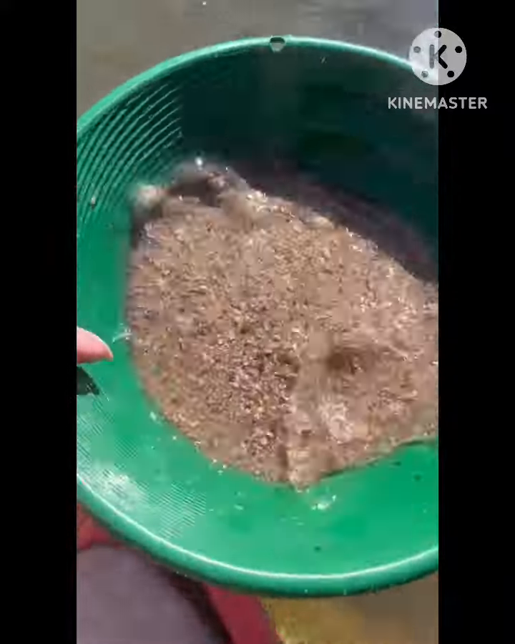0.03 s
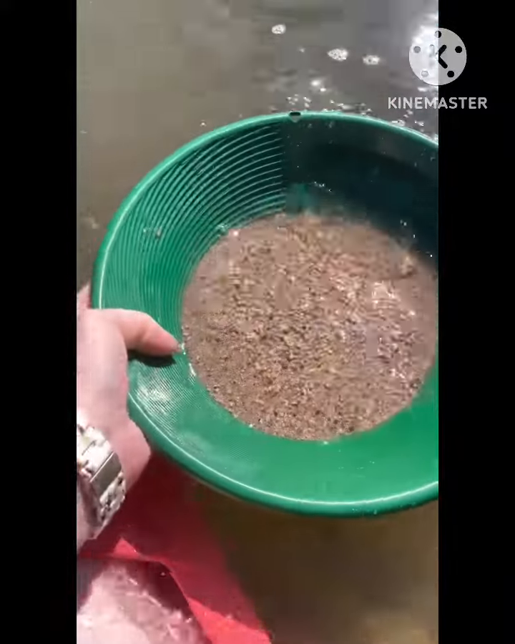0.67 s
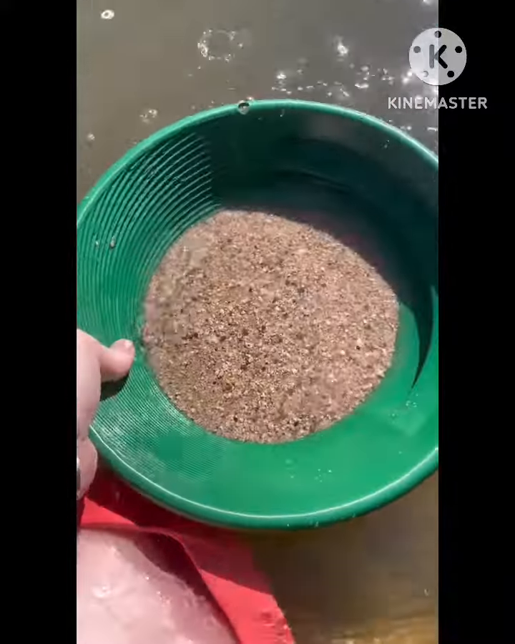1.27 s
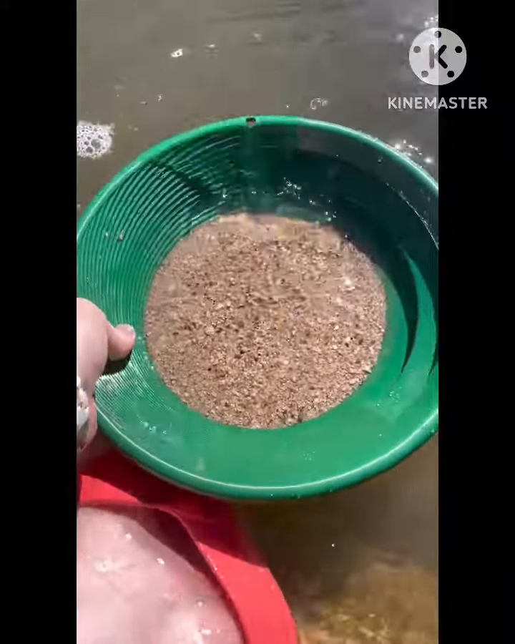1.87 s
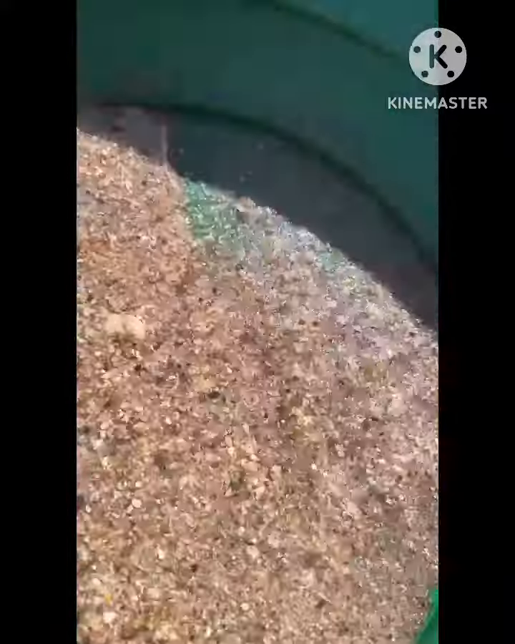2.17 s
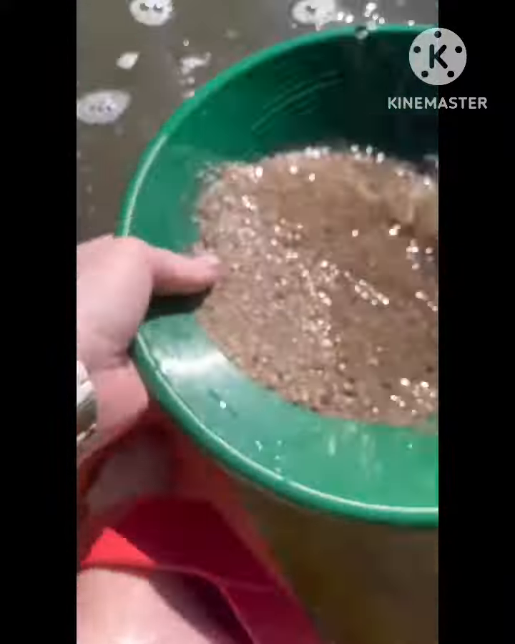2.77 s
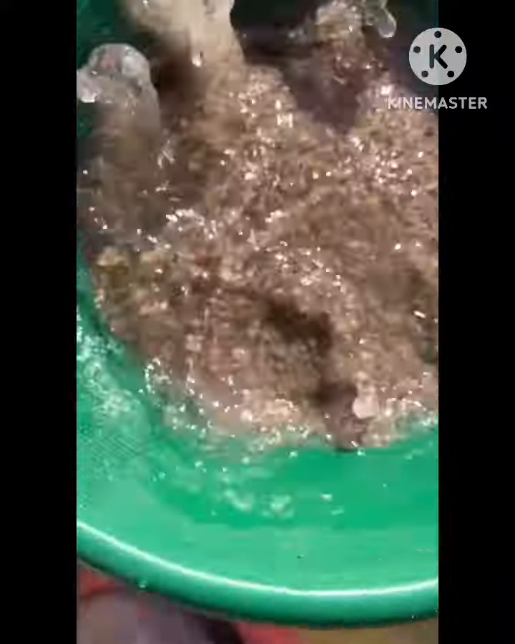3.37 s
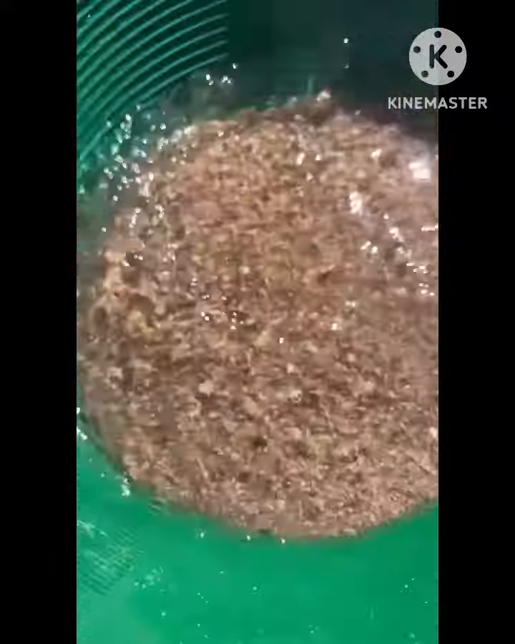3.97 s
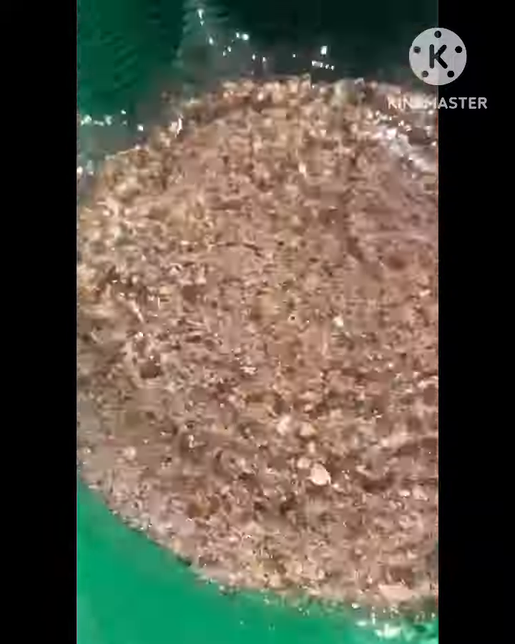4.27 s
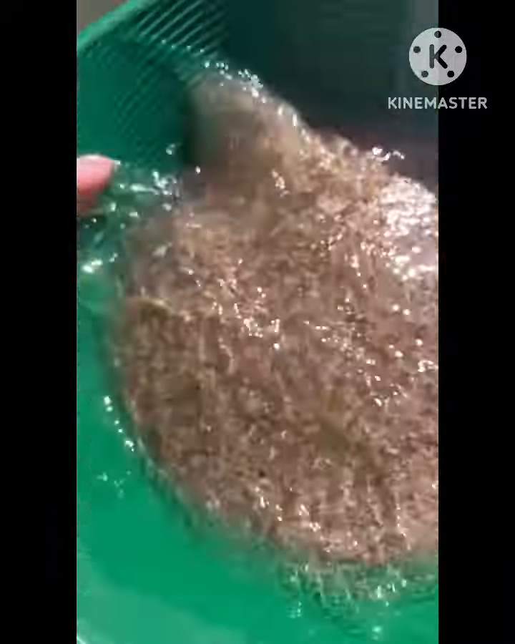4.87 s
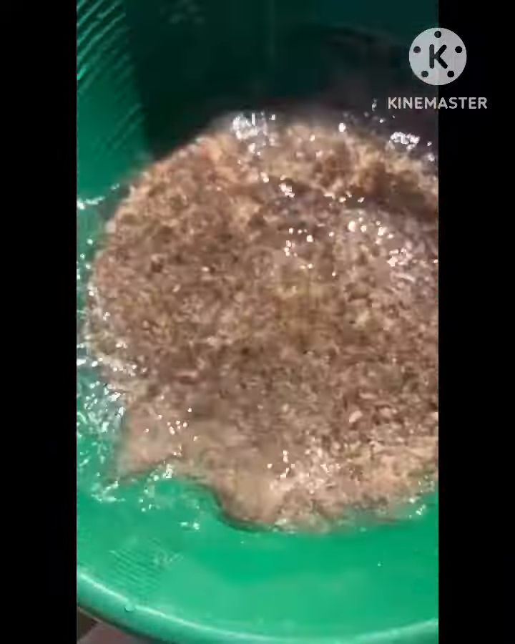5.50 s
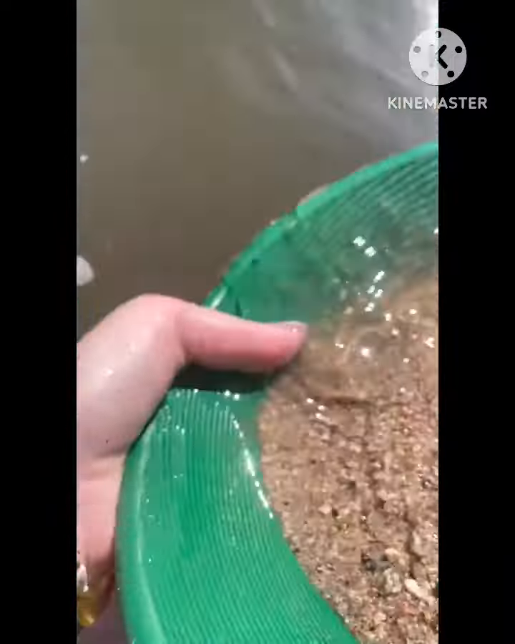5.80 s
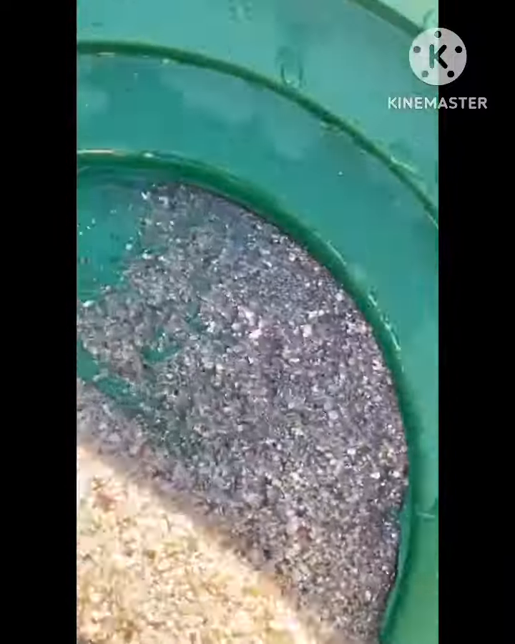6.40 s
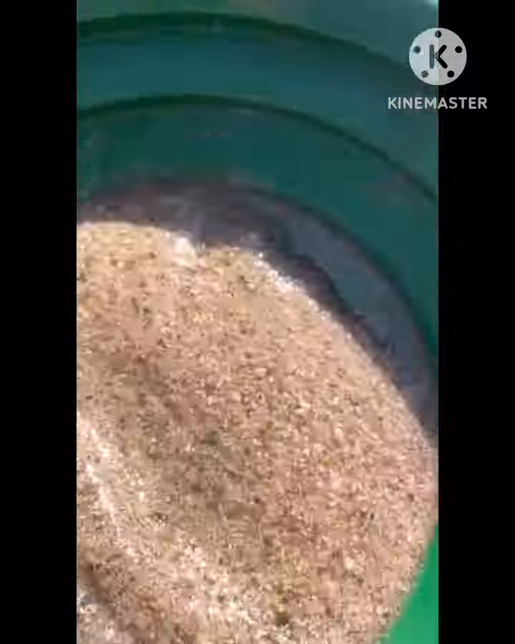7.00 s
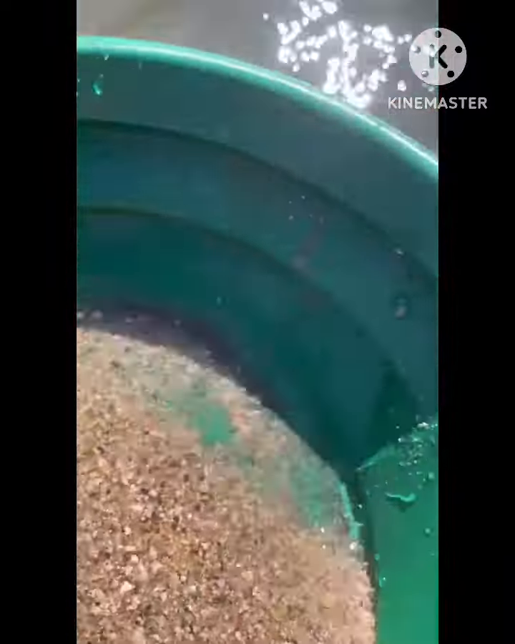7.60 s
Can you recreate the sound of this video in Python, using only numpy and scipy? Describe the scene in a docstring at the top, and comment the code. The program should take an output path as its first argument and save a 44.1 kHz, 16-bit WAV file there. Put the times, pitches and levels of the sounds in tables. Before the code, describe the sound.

A river rushes as wet sand hisses and water spits around a gold pan, with wind rumbling on the microphone.

```python
"""Gold panning at a river

Gravel is swirled in a plastic pan just above a rushing river, close to a phone. Two scenes, with a
brief fade between. First: wind rumble, stones clacking on the pan, a hollow knock. Second: water laps
and spits as trapped bubbles ring, sand hisses round the pan, and a gust buffets the microphone."""
import sys
import numpy as np
from scipy import signal
from scipy.fft import rfft, irfft
from scipy.io import wavfile

SR = 44100
rng = np.random.default_rng(int(sys.argv[2]) if len(sys.argv) > 2 else 0)


def generate_wav(sig):
    """Save sig (samples, or channels by samples) to the path in sys.argv[1] as 16-bit PCM at SR."""
    pcm = np.round(np.clip(np.atleast_2d(sig).T, -1, 1) * 32767).astype(np.int16)
    wavfile.write(sys.argv[1], SR, pcm)


N = 337365
TIME_S, FREQ_HZ = np.arange(N) / SR, np.arange(N // 2 + 1) * SR / N
TOP_HZ = 16000

# waves over the gravel: t/s, water level/dB, sand level/dB
SWIRLS = [(0.65, -40, -67), (1.319, -43.5, -66), (2.7, -53, -48.5), (3.13, -56, -46.5), (3.5, -56, -45.5),
          (3.73, -55, -49), (4.57, -41, -47), (4.78, -44, -49.5), (5.26, -53, -47.5), (5.86, -46, -48),
          (6.2, -40, -46), (7.03, -44.5, -47.5)]
# sliding sand: f/Hz, level/dB
SAND_SPECTRUM = [(1500, -13.5), (4000, -16.5), (6500, -7), (8500, 2), (12000, -5.5), (16000, -2)]
# coarse grains: t/s, peak/dB
TICKS = [(0.2255, -33), (0.257, -31), (2.6485, -26), (2.809, -21.5), (3, -25), (3.1345, -32), (3.157, -20),
         (3.616, -23), (3.66, -17), (3.73, -24), (4.5, -32), (4.59, -30), (4.8231, -30), (4.8637, -31),
         (5.2827, -32)]
# stones on the pan: t/s, blow/dB, scrape/dB, scrape length/s
STONES = [(0.3821, -31, -27.5, 0.01), (0.391, -28, -23, 0.019), (0.4018, -15.5, -29, 0.0058),
          (0.4041, -7, -25.5, 0.0035), (0.4109, -24.5, -21.5, 0.0055), (0.418, -30, -40.5, 0.042)]
# plastic pan: f/Hz, level/dB, t60/s
PAN_MODES = [(1000, -15, .012), (1580, -7, .014), (1917, -11, .04), (2000, 1.5, .01), (3190, -14, .025),
             (3400, 4, .008), (3550, -12, .025), (5090, -19, .035), (5435, -17, .04), (6190, -12, .035)]
# skidding stones: f/Hz, level/dB
SCRAPE_SPECTRUM = [(400, 1), (1800, -3.5), (6000, -1), (8500, -15.5), (10800, -1), (15000, -28)]
# knock and two bounces: t/s, level/dB
KNOCKS = [(0.8384, -12.5), (0.8474, -17.5), (0.8554, -22)]
# hollow body: f/Hz, level/dB, t60/s
KNOCK_MODES = [(780, -12.5, 0.036), (1210, 0, 0.024), (1380, -9, 0.0096)]
# bubbles of droplets, larger air pockets and low laps: t/s, level/dB, f/Hz
DROPLETS = [(2.661, -30, 5000), (2.816, -26.5, 4870), (3.0006, -31, 5350), (3.112, -34, 6200),
            (3.1547, -22.5, 8400), (3.159, -31, 5200), (3.446, -36, 10200), (3.495, -28, 5877),
            (3.5127, -19.5, 7120), (3.6195, -25.5, 6160), (3.6285, -28, 6750), (3.6602, -29, 5420),
            (3.734, -25.5, 9200), (4.3973, -30.5, 11000), (4.5213, -28, 4970), (4.527, -32, 6600),
            (4.6555, -32, 11800), (4.6662, -24.5, 10500), (4.6841, -30.5, 8950), (5.217, -35.5, 5900),
            (5.245, -30, 11800), (5.247, -36, 6700), (5.2552, -26, 11400), (6.9192, -28, 8100)]
PLIPS = [(0.5926, -35, 1430), (0.615, -33, 1400), (0.639, -30, 1380), (1.3533, -35, 1853),
         (1.4474, -39, 2900), (3.101, -26.5, 2740), (5.8425, -31, 1511), (5.8584, -35, 1630),
         (6.0014, -40, 2070), (6.1605, -29, 1350), (6.2841, -31, 1770)]
LAPS = [(2.974, -31.5, 258.8), (3.649, -34, 205), (3.813, -27, 292), (3.914, -23.5, 271), (4.026, -34, 189),
        (6.565, -31, 259), (7.479, -23, 327.4)]
# water breaking on gravel: t/s, length/s, level/dB, centre/Hz
SPRAYS = [(0.985, 0.01, -43, 2300), (0.991, 0.013, -43, 6000), (2.64, 0.031, -44, 8800),
          (3.108, 0.019, -47, 10470), (3.451, 0.04, -50, 11000), (3.503, 0.022, -41, 10500),
          (3.616, 0.015, -40, 8000), (4.534, 0.03, -45, 9500), (5.844, 0.027, -43, 5500),
          (6.138, 0.2, -48, 1880)]
NOTCHED_RUSH_SPECTRUM = [(25, -22.5), (60, -21.5), (145, -7), (184, -3), (340, -7.5), (408, -12.5),
                         (527, -5.5), (1040, -15), (1380, -17.5), (2300, -26.5), (5600, -31), (7500, -47),
                         (12000, -37), (14500, -68)]
# river's roar and babble in scene 2: f/Hz, level/dB
ROAR_SPECTRUM = [(53, -56), (90, -40), (193, -4.5), (285, -4), (440, 1.5), (514, -3.5), (698, 2.5),
                 (785, -3), (1020, -1), (1120, -11), (1500, -29), (1950, -11.5), (3300, -120)]
BABBLE_SPECTRUM = [(710, -31), (1200, 1), (1410, -3.5), (2040, -1.5), (2650, -5.5), (4650, -12.5),
                   (5530, -16), (7170, -19.5), (13300, -22.5), (16000, -27)]
# river, left-right likeness per scene: f/Hz, coherence/0-1
COHERENCE_1 = [(300, 1), (480, 0.71), (750, 0.1)]
COHERENCE_2 = [(1050, 1), (1350, 0.88), (1900, 0.3), (3200, 0.035)]
# river, lean per scene: f/Hz, left over right/dB
LEAN_1 = [(100, 0.5), (300, 4.6), (420, 2), (730, 9.3), (1000, 2.3), (1220, 6.9), (1900, 0.78)]
LEAN_2 = [(1300, 0.94), (2000, 7.2), (2700, 7.2), (4000, 3.8), (8000, 0.52)]
# phone's wind suppression, deepest just after the gust: t/s, level/dB
WIND_DUCKING = [(2.2, -2), (3.9, -1.5), (4.79, -4.5), (4.85, -13), (5.02, -8), (5.07, -2.5)]
# wind in scene 1: t/s, level/dB
RUMBLE_LEVEL = [(0, -30.5), (.5, -29), (.82, -32), (.95, -25.5), (1.2, -29.5), (1.4, -25.5), (1.9, -28.5)]
# wind in scene 2: peak t/s, level/dB, rise tau/s, fall tau/s
GUSTS = [(4.79, -38.5, 1.38, 0.14), (5.53, -44.5, 0.11, 4.3)]
# wind in scenes 1 and 2: f/Hz, level/dB
RUMBLE_SPECTRUM = [(20, -26.5), (45, 1), (65, 5), (140, 3), (180, 4), (300, -3.5), (500, -12.5),
                   (1200, -52.5)]
GUST_SPECTRUM = [(25, -54), (60, -13.5), (150, -6), (230, 3.5), (380, -1.5), (800, -10.5), (2500, -47)]
# eddies at the microphone: t/s, length/s, level/dB, upper edge/Hz
BUFFETS = [(4.129, 0.025, -35.5, 447), (4.335, 0.032, -29.5, 564), (4.379, 0.019, -27, 520),
           (4.393, 0.047, -28, 787), (4.509, 0.028, -31.5, 795), (4.566, 0.0086, -24.5, 1080),
           (4.576, 0.013, -36, 1600), (4.614, 0.012, -25.5, 915), (4.618, 0.0053, -24.5, 2230),
           (4.676, 0.023, -34.5, 1600), (4.724, 0.013, -33.5, 1590), (4.743, 0.019, -37, 800),
           (4.781, 0.014, -26, 2480), (4.787, .012, -25, 2070), (4.794, 0.031, -33, 700),
           (5.52, 0.07, -40.5, 384), (6.831, 0.03, -36.5, 342)]
# scene 1 out, scene 2 in: t/s, gain/0-1
FADE_OUT = [(1.87, 1), (1.94, 0.56), (1.985, 0.21), (1.996, 0)]
FADE_IN = [(2.08, 0), (2.11, 0.1), (2.16, 0.4), (2.24, 0.96)]


def swirling(rise_s, water_settle_s, sand_settle_s, rest_db):
    """Water and sand envelopes: the sand slides on after each wave; the water never quite rests."""
    water_gain, sand_gain = undb(rest_db), 0
    for peak_s, water_db, sand_db in SWIRLS:
        water_gain = np.maximum(water_gain, undb(water_db) * surge(peak_s, rise_s, water_settle_s))
        sand_gain = np.maximum(sand_gain, undb(sand_db) * surge(peak_s, rise_s, sand_settle_s))
    return water_gain, sand_gain


def sand(gain, grains_per_s, spread_db):
    """Wet grains tick against each other and the pan."""
    hits = rng.random((2, N)) < grains_per_s / SR
    size = undb(spread_db * np.minimum(rng.exponential(size=(2, N)), 4))
    polarity = rng.choice([-1, 1], (2, N))
    return unit(coloured(hits * size * polarity, SAND_SPECTRUM)) * gain


def ticks(low_hz, shared):
    """Coarse grains hit the plastic, dry and bright."""
    out = np.zeros((2, N))
    band = butter(2, [low_hz, TOP_HZ], "band")
    for start_s, db in TICKS:
        contact = rng.standard_normal((3, 48)) * np.hanning(48)
        tick = signal.sosfilt(band, contact[:2] + shared * contact[2])
        add(out, start_s, undb(db) * tick / abs(tick).max())
    return out


def stones(ring_db, rub_db):
    """Each stone rings the pan, then skids in a fading burst of tiny contacts."""
    blows, scrapes = np.zeros((2, 2, N))
    hard_contact = np.array([[1.0, 0.21, -0.19, -0.17], [0.16, 0.28, 0.94, 0.12]])  # left leads
    for start_s, blow_db, scrape_db, length_s in STONES:
        add(blows, start_s, undb(blow_db) * hard_contact)
        n = int(length_s * SR)
        contacts = rng.standard_normal((3, SR // 10))[:, :n] * np.sqrt(np.linspace(1, 0, n))
        add(scrapes, start_s, undb(scrape_db) * unit(contacts[:2] + .5 * contacts[2]))
    ringing = ring(blows + undb(rub_db) * scrapes, PAN_MODES, rise_s=0.00047)
    return undb(ring_db) * ringing + coloured(scrapes, SCRAPE_SPECTRUM)


def knock(left_db):
    """A soft contact and its bounces ring a hollow body."""
    force, push = np.zeros((1, N)), np.hanning(16)
    for start_s, db in KNOCKS:
        add(force, start_s, undb(db) * push / push.sum())
    return panned(ring(force, KNOCK_MODES, rise_s=0.0011), left_db)


def ring(force, modes, rise_s):
    """Damped modes build up as a blow spreads through the body."""
    t = TIME_S[:SR // 8]
    response = sum(undb(db) * np.sin(2 * np.pi * hz * t) * np.exp(-np.log(1000) * t / t60_s)
                   for hz, db, t60_s in modes)
    onset = 1 - np.exp(-t / rise_s)
    return signal.fftconvolve(force, response[None] * onset, axes=1)[:, :N]


def bubble(hz, cycles, glide, skew_rad):
    """A bubble pinches off: its tone swells, then dies while rising. Left leads by skew_rad."""
    hz = min(hz, SR / 3)
    age = np.arange(int(cycles * SR / hz) + 2) * hz / SR / cycles
    phase = 2 * np.pi * cycles * age * (1 + glide * age / 2)
    swell = 6 * age * np.exp(1 - 6 * age)
    return swell * np.sin(phase + np.array([[skew_rad], [-skew_rad]]) / 2)


def froth(gain, low_hz, high_hz, cycles, spread_db, left_db, count=4000):
    """Water over gravel traps many bubbles: most faint, a few loud."""
    out = np.zeros((2, N))
    for when, pitch, size, skew in rng.random((count, 4)):
        hz = low_hz * (high_hz / low_hz) ** pitch
        tone = bubble(hz, cycles, glide=.08, skew_rad=4 * skew - 1)
        add(out, when * TIME_S[-1], undb(spread_db * size ** 3) * tone)
    return panned(unit(out), left_db) * gain


def spits(ring_s, glide, skew_rad):
    """Droplets hit the pan wall, each trapping one tiny bubble."""
    out = np.zeros((2, N))
    for start_s, db, hz in DROPLETS:
        add(out, start_s, undb(db) * bubble(hz, ring_s * hz, glide, rng.normal(skew_rad, 0.62)))
    return out


def sprays(width_oct, drops_per_s, spread_db, shared):
    """A sheet of water breaks on the gravel into uneven drops."""
    out, edge_ratio = np.zeros((2, N)), 2 ** (width_oct / 2)
    for start_s, length_s, db, hz in SPRAYS:
        kick, size = rng.standard_normal((2, 3, SR // 4))
        hits = rng.random(SR // 4) < drops_per_s / SR
        drops = hits * np.sign(kick) * undb(spread_db * size)
        band = butter(2, [hz / edge_ratio, min(hz * edge_ratio, TOP_HZ)], "band")
        swish = signal.sosfilt(band, drops[:2] + shared * drops[2])[:, :int(length_s * SR)]
        add(out, start_s, undb(db) * unit(swish * signal.windows.tukey(swish.shape[1], .5)))
    return out


def air_pockets(rows, cycles, glide, skew_rad, left_db):
    """Single large bubbles ring in slopping or lapping water."""
    out = np.zeros((2, N))
    for start_s, db, hz in rows:
        add(out, start_s, undb(db) * bubble(hz, cycles, glide, skew_rad))
    return panned(out, left_db)


def river(spectrum, coherence, lean, swell_db, flicker_db):
    """Countless far splashes: octave bands swell together and flicker separately."""
    alike, ears = np.clip(over_freq(coherence), 0, 1), np.array([[1], [-1]])
    mid, side = rfft(rng.standard_normal((2, N)))
    noise = np.sqrt(1 + alike) * mid + ears * np.sqrt(1 - alike) * side
    noise *= undb(over_freq(spectrum) + ears * over_freq(lean) / 2)
    octave = np.log2(np.clip(FREQ_HZ, 128, 8192) / 128)
    common_db, out = swell_db * wander(rate_hz=3.89), 0
    for k in range(7):
        band = irfft(noise * np.maximum(1 - abs(octave - k), 0), N)
        out = out + band * undb(common_db + flicker_db * wander(rate_hz=30))
    return unit(out)


def wind(gain, spectrum, churn_db, side_db):
    """Low, uneven turbulence at the microphone, nearly alike in both channels."""
    mid, side = (coloured(rng.standard_normal(N), spectrum) * undb(churn_db * wander(rate_hz=35))
                 for _ in range(2))
    return unit(mid + undb(side_db) * np.array([side, -side])) * gain


def gusting(breeze_db):
    """Wind envelope: gusts add their power to a breeze."""
    power = sum((undb(db) * surge(peak_s, rise_s, fall_s)) ** 2 for peak_s, db, rise_s, fall_s in GUSTS)
    return np.sqrt(undb(breeze_db) ** 2 + power)


def buffets(low_hz, side_hz, wake_db, wake_s):
    """Each eddy is a puff with a weaker wake; only its fine swirls differ between channels."""
    out, age_s = np.zeros((2, N)), TIME_S[:SR // 4]
    for start_s, length_s, db, top_hz in BUFFETS:
        mid, side = rng.standard_normal((2, len(age_s)))
        side = signal.sosfilt(butter(2, side_hz, "high"), side)
        band = butter(3, [low_hz, max(top_hz, 2 * low_hz)], "band")
        n = int(length_s * SR)
        shape = undb(wake_db) * np.minimum(age_s / length_s, np.exp((length_s - age_s) / wake_s))
        shape[:n] = np.maximum(shape[:n], signal.windows.tukey(n, .5))
        puff = signal.sosfilt(band, [mid + side, mid - side])[:, ::-1] * shape
        add(out, start_s, undb(db) * unit(puff) * np.sqrt(n / len(age_s)))
    return out


def wind_ducking(rush):
    """The phone turns the rush's lows and mids down on a set curve, most just after the gust."""
    ducked_band = coloured(rush, [(200, 4.0), (500, 1.5), (1800, -0.5), (3000, -6.0), (6000, -66)])
    return rush + ducked_band * (undb(over_time(WIND_DUCKING)) - 1)


def undb(db):
    """Decibels to gain."""
    return 10 ** (np.asarray(db) / 20)


def unit(x):
    """Scale to rms 1."""
    return x / np.sqrt(np.mean(x ** 2) + 1e-18)


def over_time(rows):
    """Interpolate (t/s, value) rows."""
    return np.interp(TIME_S, *np.transpose(rows))


def over_freq(rows):
    """Interpolate (f/Hz, value) rows on a log axis."""
    hz, value = np.transpose(rows)
    return np.interp(np.log(FREQ_HZ + 1), np.log(hz + 1), value)


def coloured(x, spectrum):
    """Filter by (f/Hz, level/dB) rows."""
    return irfft(rfft(x) * undb(over_freq(spectrum)), N)


def butter(order, hz, kind):
    """Maximally flat filter sections."""
    return signal.butter(order, hz, kind, fs=SR, output="sos")


def wander(rate_hz):
    """Random drift, spread near 1."""
    knots = rng.standard_normal(1024)
    return 1.2 * np.interp(TIME_S * rate_hz, np.arange(len(knots)), knots)


def surge(peak_s, rise_s, fall_s):
    """Exponential rise to 1, then decay."""
    return np.exp(np.minimum((TIME_S - peak_s) / rise_s, (peak_s - TIME_S) / fall_s))


def panned(x, left_db):
    """Set the level of left over right."""
    return x * undb(np.array([[left_db], [-left_db]]) / 2)


def lagged(x, lag_ms):
    """Sound reaches the right channel later."""
    delay = np.exp(-2j * np.pi * FREQ_HZ * lag_ms / 1000)
    return np.array([x[0], irfft(rfft(x[1]) * delay, N)])


def add(out, start_s, x):
    """Mix x in at start_s."""
    i = max(int(start_s * SR), 0)
    out[..., i:i + x.shape[-1]] += x[..., :max(N - i, 0)]


def scene():
    """Two scenes of river and wind; the swirling pan runs through both."""
    rush = undb(-33.0) * river(NOTCHED_RUSH_SPECTRUM, COHERENCE_1, LEAN_1, swell_db=-0.5, flicker_db=0.9)
    rumble = undb(-5.0) * wind(undb(over_time(RUMBLE_LEVEL)), RUMBLE_SPECTRUM, churn_db=1.5, side_db=-18.5)
    first = lagged(rush + rumble, lag_ms=0.19) + stones(ring_db=-3.5, rub_db=-20.0) + knock(left_db=15.0)

    roar = undb(-37.0) * river(ROAR_SPECTRUM, COHERENCE_2, LEAN_2, swell_db=-0.27, flicker_db=0.6)
    babble = undb(-40.5) * river(BABBLE_SPECTRUM, COHERENCE_2, LEAN_2, swell_db=-0.47, flicker_db=1.3)
    gusts = wind(gusting(breeze_db=-74), GUST_SPECTRUM, churn_db=3.5, side_db=-19.0)
    eddies = buffets(low_hz=171, side_hz=1390.0, wake_db=-8.5, wake_s=0.014)
    gulps = air_pockets(LAPS, cycles=5, glide=0.072, skew_rad=0, left_db=0.5)
    phone_bass_cut = butter(4, 115, "high")
    second = wind_ducking(roar + babble) + signal.sosfilt(phone_bass_cut, gusts + eddies + gulps)

    water_gain, sand_gain = swirling(rise_s=0.15, water_settle_s=0.073, sand_settle_s=0.23, rest_db=-51)
    fizz = undb(-4.5) * froth(sand_gain, low_hz=3830, high_hz=14350, cycles=72, spread_db=5, left_db=2)
    slosh = undb(-3) * froth(water_gain, low_hz=1350, high_hz=2890, cycles=12.7, spread_db=11, left_db=1)
    drops = spits(ring_s=0.002, glide=0.12, skew_rad=0.86)
    spatter = sprays(width_oct=1.66, drops_per_s=1700, spread_db=4.5, shared=0.54)
    plips = air_pockets(PLIPS, cycles=12.3, glide=0.059, skew_rad=0.69, left_db=4)
    hiss = undb(-2.0) * sand(sand_gain, grains_per_s=670, spread_db=6.0)
    pan = slosh + fizz + drops + spatter + plips + hiss + ticks(low_hz=3500, shared=0.61)
    return (first + pan) * over_time(FADE_OUT) + (second + pan) * over_time(FADE_IN)


def record(dry):
    """The phone cuts the top."""
    return signal.sosfilt(signal.ellip(10, .2, 80, TOP_HZ, fs=SR, output="sos"), dry)


dry = scene()
out = record(dry)
generate_wav(out)
```